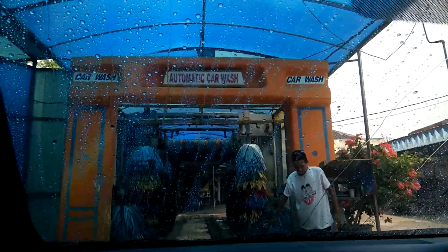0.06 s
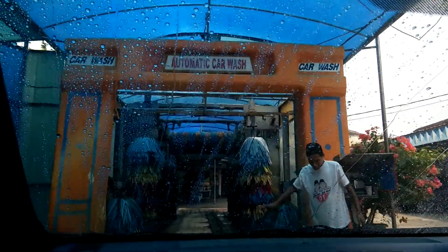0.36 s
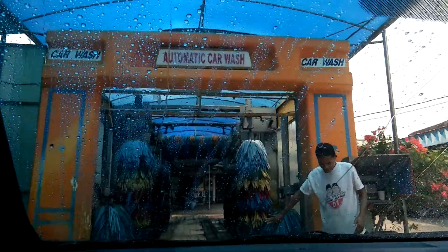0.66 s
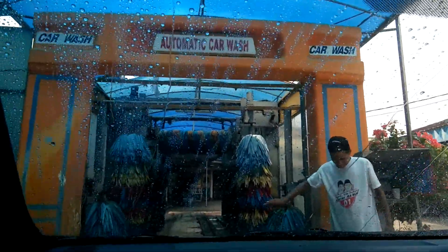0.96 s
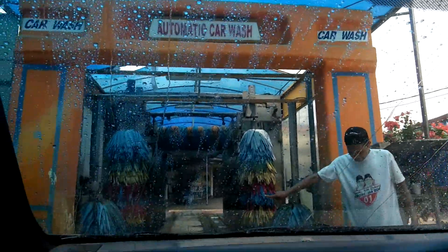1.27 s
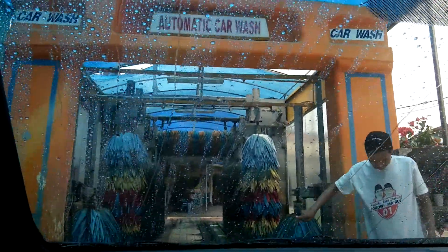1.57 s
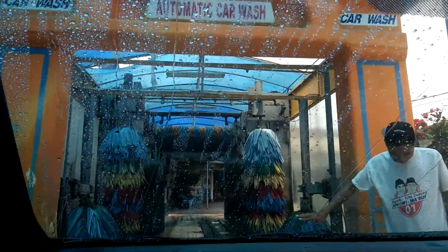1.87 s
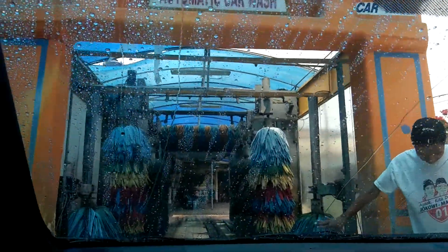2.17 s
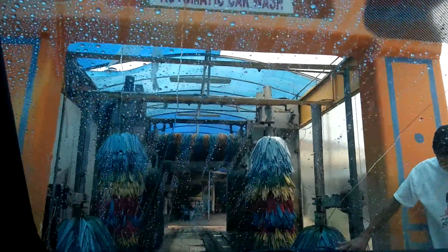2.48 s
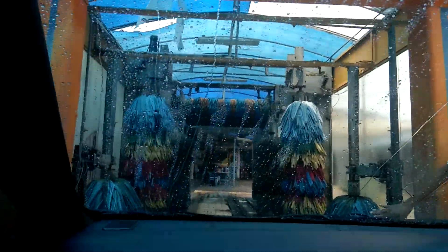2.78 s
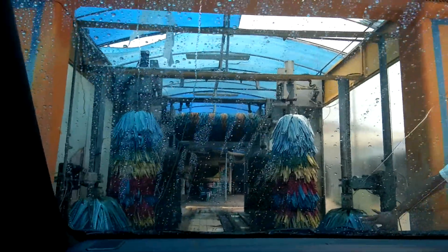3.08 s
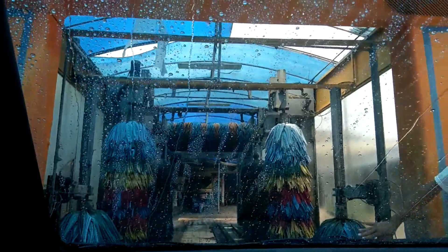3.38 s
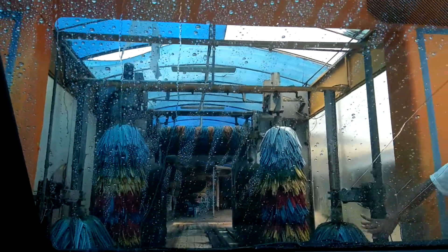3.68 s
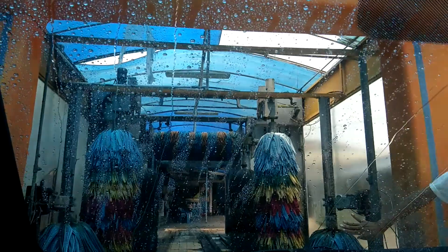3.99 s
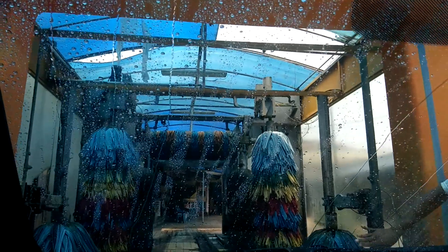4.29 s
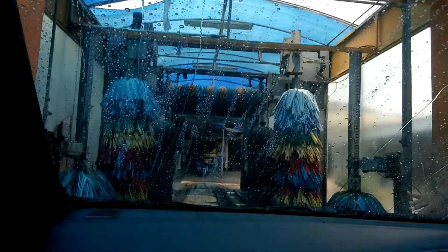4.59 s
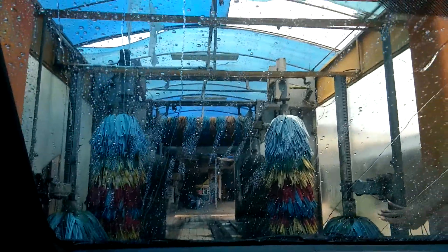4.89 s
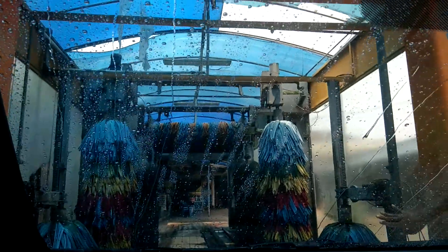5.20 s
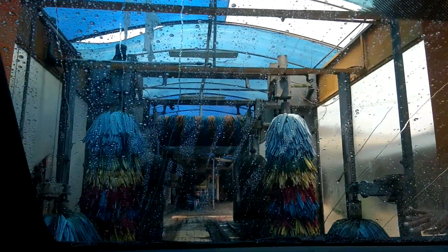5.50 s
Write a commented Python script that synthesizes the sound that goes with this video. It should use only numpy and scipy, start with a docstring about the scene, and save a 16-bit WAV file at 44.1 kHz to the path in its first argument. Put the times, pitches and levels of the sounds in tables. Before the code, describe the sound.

Car wash jets spray a car in three passes, fizzing, drumming and thumping over a low engine hum inside the cabin.

```python
"""Car wash from inside the car

One small microphone in the cabin of an idling car, with the water just beyond the glass and panels.
A fine mist hisses on the windscreen, then jets pass three times over bonnet, glass and roof: the
panels drum and rumble, the spray fizzes, single drops tick. The jets stop suddenly; the engine hums on."""
import sys
import numpy as np
from scipy import signal
from scipy.fft import rfft, irfft
from scipy.io import wavfile

SR = 44100
rng = np.random.default_rng(int(sys.argv[2]) if len(sys.argv) > 2 else 0)


def to_wav(s):
    """Save 16-bit WAV."""
    ch = np.atleast_2d(s).T  # columns
    pcm = np.round(np.clip(ch, -1, 1) * 32767)  # PCM
    wavfile.write(sys.argv[1], SR, pcm.astype(np.int16))


N = 248503
TIME = np.arange(N) / SR


def amp(db):
    """Decibels to gain."""
    return 10 ** (np.asarray(db) / 20)


def evened(x):
    """Scales to rms 1."""
    return x / np.sqrt(np.mean(x ** 2) + 1e-20)


def level(rows):
    """Rows of seconds and dB as a gain, dying at 250 dB a second after the last."""
    s, db = np.transpose(rows)
    return amp(np.interp(TIME, s, db) - 250 * np.maximum(TIME - s[-1], 0))


def add(mix, s, sound):
    """Mixes a sound in at s seconds."""
    part = mix[max(round(s * SR), 0):][:len(sound)]
    part += sound[:len(part)]


def colour(x, spectrum, peaks=()):
    """Filters x through a spectrum and the resonances on it; rms 1."""
    grid = np.fft.rfftfreq(16384, 1 / SR)
    hz, db = np.transpose(spectrum)
    octaves_outside = abs(np.log2((grid + 1) / np.clip(grid + 1, hz[0], hz[-1])))
    shape_db = np.interp(np.log(grid + 1), np.log(hz), db) - 30 * octaves_outside
    for centre, width, lift_db in peaks:
        shape_db += lift_db / (1 + (2 * (grid - centre) / width) ** 2)
    log_gain = np.log(amp(np.maximum(shape_db, -100)))
    mirrored = np.concatenate([log_gain, log_gain[-2:0:-1]])
    ring = irfft(np.exp(np.conj(signal.hilbert(mirrored)))[:len(grid)])  # minimum phase
    return evened(irfft(rfft(x) * rfft(ring, N), N))


def drift(rate_hz):
    """A smooth random wavering up to about this rate; rms 1."""
    hz = np.fft.rfftfreq(N, 1 / SR)
    band = hz / (hz + rate_hz / 4) / (1 + (hz / rate_hz) ** 4)
    return evened(irfft(rfft(rng.standard_normal(N)) * band, N))


def drops(per_s, spread_db, wash):
    """Impacts of many small and a few large drops over a smooth wash."""
    size = amp(spread_db * np.minimum(rng.exponential(1, N), 4)) * rng.choice([-1, 1], N)
    impacts = evened(size * (rng.random(N) < per_s / SR))
    return evened(impacts + wash * rng.standard_normal(N))


def gushes(per_s, fade_s, depth):
    """Water arrives in clumps that strike at once and drain away: a gain around 1."""
    clumps = rng.uniform(0.34, 1, N) * (rng.random(N) < per_s / SR)
    draining = signal.lfilter([1], [1, -np.exp(-1 / (fade_s * SR))], clumps)
    return np.sqrt(evened(1 + depth * draining))


def wander(x, depth_db, patch_hz, patch_s):
    """As the point of impact moves, neighbouring modes swell and fade in turn."""
    frames = signal.stft(x, nperseg=1024, noverlap=768)[2]
    across = signal.windows.hann(max(int(2 * patch_hz * 1024 / SR), 3))
    along = signal.windows.hann(max(int(2 * patch_s * SR / 256), 3))
    patches = signal.fftconvolve(rng.standard_normal(frames.shape), np.outer(across, along), "same")
    frames *= amp(depth_db * np.clip(evened(patches), -2, 2))
    return evened(signal.istft(frames, nperseg=1024, noverlap=768)[1][:N])


def driven(db, drain_db_per_s, by_heavy=0, by_light=0):
    """Gain that follows the heavy water and light drops (dB per dB) and dies away after each pass."""
    # Three passes of the jets. Each row: time in seconds, heavy water in dB, light drops in dB.
    first_pass = [(0.83, -46.5, -50), (0.866, -53.5, -48.5), (1.29, -46, -48.5), (1.422, -53, -56),
                  (1.52, -45, -60.5)]
    second_pass = [(1.55, -41.5, -63), (1.63, -41.5, -46.5), (1.738, -41.5, -44), (1.81, -53, -59.5),
                   (1.92, -56, -80)]
    long_pass = [(1.942, -49, -61.5), (1.985, -43.5, -50), (2.08, -40.5, -56.5), (2.14, -46, -56.5),
                 (2.59, -41, -54.5), (2.62, -43, -59), (2.86, -40.5, -39), (3.0, -30.5, -44.5),
                 (3.04, -37, -48), (3.192, -39, -51.5), (3.21, -38.5, -53), (3.39, -35, -52.5),
                 (3.66, -32.5, -49.5), (4.14, -35, -50), (4.316, -37.5, -42)]
    middling_heavy_db, middling_light_db, onset_db_per_s = -41, -50, 503
    gain = np.zeros(N)
    for rows in (first_pass, second_pass, long_pass):
        s, heavy, light = np.transpose(rows)
        flow_db = by_heavy * (heavy - middling_heavy_db) + by_light * (light - middling_light_db)
        before, after = np.maximum(s[0] - TIME, 0), np.maximum(TIME - s[-1], 0)
        fade_db = onset_db_per_s * before + drain_db_per_s * after
        gain = np.maximum(gain, amp(db + np.interp(TIME, s, flow_db) - fade_db))
    return gain


def idle(waver_db=2.2, throb=0.44):
    """Wavering engine orders over the dull background of the cabin, which throbs with each firing."""
    # Engine speed. Each row: time in seconds, firing rate in Hz.
    firing = [(0, 27.2), (4.5, 25.68)]
    # Engine hum. Each row: multiple of the firing rate, level in dB.
    orders = [(2, -62.5), (3, -59), (5, -69.5)]
    # Cabin background. Each row: frequency in Hz, relative level in dB.
    cabin = [(30, -23), (50, 3), (95, -4), (135, -5), (220, -19), (400, -20), (600, -31), (1300, -33.5),
             (2200, -39), (6000, -45.5), (15500, -46)]
    # Its loudness. Each row: time in seconds, level in dB.
    cabin_db = [(0, -52.5), (.7, -52.5), (5.63, -59.5)]
    firing_hz = np.interp(TIME, *np.transpose(firing)) * (1 + .015 * drift(rate_hz=6))
    cycles = np.cumsum(firing_hz) / SR
    hum = np.zeros(N)
    for order, db in orders:
        peak = np.sqrt(2) * amp(db + waver_db * drift(rate_hz=3.5))
        hum += peak * np.sin(2 * np.pi * (order * cycles + rng.random()))
    air = colour(rng.standard_normal(N), cabin) * level(cabin_db)
    bass = signal.sosfilt(signal.butter(2, 400, fs=SR, output="sos"), air)
    return hum + air + throb * bass * np.cos(2 * np.pi * cycles)


def thumps():
    """The body of the car flexes and jolts: a panel gives way and swings out."""
    # Each row: start in seconds, level in dB, pitch in Hz, rise and 60 dB decay in seconds.
    jolts = [(0.012, -36, 80.7, 0.0038, 0.32), (0.867, -27.5, 111, 0.0029, 0.075),
             (1.753, -25.5, 263, 0.014, 0.17), (2.191, -27, 52.2, 0.028, 0.4),
             (2.254, -34, 133, 0.0037, 0.072), (2.874, -20.5, 131, 0.0016, 0.21),
             (3.061, -1, 45.7, 0.065, 0.23), (3.416, -22.5, 145.4, 0.027, 0.22),
             (3.68, -19.5, 53.8, 0.01, 0.24), (4.059, -16.5, 137, 0.0068, 0.1),
             (4.249, -20, 136, 0.0019, 0.14), (5.11, -41, 77.7, 0.034, 0.25)]
    out, t = np.zeros(N), TIME[:SR // 2]
    for s, db, hz, rise, t60 in jolts:
        envelope = amp(db - 60 * t / t60) * (1 - np.exp(-(t / rise) ** 2))
        add(out, s, envelope * np.sin(2 * np.pi * hz * t))
    return out


def mist():
    """A fluttering fan of fine droplets rings the windscreen."""
    # The mist closing in. Each row: time in seconds, relative level in dB.
    approach = [(0.0, -74), (0.35, -76), (0.765, -59), (0.8, -49.5), (0.85, -45.5), (0.935, -45.5),
                (0.99, -50.5), (1.02, -62), (1.12, -79)]
    # Its hiss. Each row: frequency in Hz, relative level in dB.
    hiss = [(600, -2), (2300, -6), (3200, -14), (7500, -12), (10000, -6.5), (12200, -6.5), (13500, -11),
            (15500, -20)]
    # Windscreen resonances. Each row: centre in Hz, width in Hz, lift in dB.
    glass = [(1330, 340, 8.7), (2140, 180, 9.3), (4070, 600, 6.3), (10800, 960, 4.5), (11700, 930, 5.5)]
    impacts = drops(per_s=7900, spread_db=3.5, wash=0.14) * gushes(per_s=130, fade_s=0.005, depth=7)
    impacts = wander(impacts, depth_db=2.2, patch_hz=350, patch_s=.1)
    return amp(1.5) * colour(impacts, hiss, glass) * level(approach)


def bodywork(surge):
    """Heavy water drums the bonnet ahead and the roof overhead; light drops patter on trim and glass."""
    # Roof, bonnet, and thin trim with glass. Each row: frequency in Hz, relative level in dB.
    shell = [(290, -37), (350, -17), (430, -11), (515, -16.5), (670, -16.5), (900, -12), (1170, -22.5),
             (1450, -22.5), (2100, -37.5)]
    hollow = [(165, -27.5), (205, -7), (262, -3), (305, -9), (380, -13.5)]
    trim = [(560, -5.5), (690, 2.5), (860, -2.5), (1120, -5), (1400, -4.5), (2000, -2), (2600, -4),
            (3100, -16), (4500, -30.5)]
    # Bodywork resonances and one notch. Each row: centre in Hz, width in Hz, lift in dB.
    panels = [(423.9, 87, 15.5), (465, 14, 9.5), (570, 30, 7), (673, 26, -8), (831.6, 61, 9.5),
              (881.5, 13, 8), (1110, 19, 7.5), (1321, 100, 9), (1457, 34, 9.5), (1602, 24, 9.5),
              (1810, 100, 5), (2017, 47, 4), (2378, 28, 11)]
    heavy = drops(per_s=2500, spread_db=3, wash=0.63) * amp(0.38 * surge)
    heavy = wander(heavy, depth_db=2.3, patch_hz=150, patch_s=.08)
    light = drops(per_s=3000, spread_db=3, wash=0.55) * amp(1.37 * surge)
    light = wander(light, depth_db=2.7, patch_hz=200, patch_s=.06)
    roof = colour(heavy, shell, panels) * driven(db=-41, by_heavy=1.19, drain_db_per_s=232)
    bonnet_jets = driven(db=-47, by_heavy=0.31, by_light=0.36, drain_db_per_s=198)
    bonnet = colour(heavy, hollow) * np.hypot(sheets(), bonnet_jets)
    patter = colour(light, trim, panels) * driven(db=-48, by_light=0.91, drain_db_per_s=320)
    return roof + bonnet + patter


def shudder():
    """The push of the heavy water shakes the roof and the air around the microphone."""
    # Cabin boom and roof rumble. Each row: frequency in Hz, relative level in dB.
    cabin = [(27, -62), (38, -12), (47, -3.5), (62, -1), (80, -20.5), (130, -46.5)]
    roof = [(55, -42.5), (85, 2), (128, 1.5), (152, 1), (178, -12), (280, -23)]
    boom = colour(rng.standard_normal(N), cabin) * driven(db=-49.5, by_heavy=1.7, drain_db_per_s=40)
    rumble = colour(rng.standard_normal(N), roof) * driven(db=-45, by_heavy=0.93, drain_db_per_s=95)
    return boom + rumble


def spray(surge):
    """Droplets burst on the glass: squirts patter sharply, light drops make a finer splash and fizz."""
    # Splash and fizz heard through the glass. Each row: frequency in Hz, relative level in dB.
    splash = [(2200, -35), (3100, 7), (4400, 8), (5500, -6), (8000, -21)]
    fizz = [(4000, -14.5), (5900, 2), (6900, -4.5), (8100, -10), (10000, -6), (12200, -3), (13500, -8),
            (15500, -18)]
    # Sheen of the finest droplets. Each row: centre in Hz, width in Hz, lift in dB.
    sheen = [(14600, 2400, 2.5)]
    patter = drops(per_s=1600, spread_db=3, wash=0.45) * gushes(per_s=220, fade_s=0.003, depth=5)
    fine = evened(rng.standard_normal(N)) * amp(1.4 * surge)
    fine = wander(fine, depth_db=2, patch_hz=600, patch_s=.04)
    direct = (amp(-4.5) * colour(patter, splash) + colour(patter, fizz)) * squirts()
    splashing = colour(fine, splash) * driven(db=-67.5, by_light=0.76, drain_db_per_s=227)
    fizzing = colour(fine, fizz, sheen) * driven(db=-71, by_light=0.75, drain_db_per_s=350)
    return direct + splashing + fizzing


def runoff():
    """A thin wash of water runs down the car and ebbs slowly after each pass."""
    # Each row: frequency in Hz, relative level in dB.
    wash = [(400, -5.5), (780, 5.5), (1200, -16.5), (4500, -16.5)]
    return colour(rng.standard_normal(N), wash) * driven(db=-66.5, drain_db_per_s=32.5)


def slaps_and_ticks(spit_db=-6.5):
    """Water hits in short dying bursts; single drops ring more narrowly, and bright hits spit hiss."""
    # Single drops on the glass. Each row: start in seconds, relative level in dB.
    ticks = [(1.784, -39), (1.8007, -37), (1.8347, -40), (1.8692, -44), (1.887, -41), (1.911, -42.5),
             (1.93, -44)]
    # Slaps on glass and panels. Each row: start in seconds, relative level in dB, centre in Hz.
    slaps = [(0.919, -30, 11000), (1.49, -42, 5900), (1.65, -36.5, 3600), (1.726, -29, 2120),
             (1.941, -30.5, 634), (1.973, -42, 4600), (2.1204, -44.5, 6160), (2.198, -44, 12000),
             (2.252, -22, 435), (2.509, -41.5, 5500), (2.5674, -36.5, 4430), (2.868, -27.5, 1720),
             (2.954, -35.5, 3180), (2.973, -23, 530), (3.203, -28, 770), (3.428, -45.5, 3450),
             (3.694, -47.5, 5000), (3.787, -37.5, 3350), (3.97, -48, 4600), (4.219, -39, 3320),
             (4.296, -39, 3620)]
    out, t = np.zeros(N), TIME[:SR // 4]

    def hit(db, hz, t60, rise_s, spread):
        band = signal.butter(2, [hz / (1 + spread), hz * (1 + spread)], "band", fs=SR, output="sos")
        noise = rng.standard_normal(len(t))
        on_glass = hz > 4000
        burst = evened(signal.sosfilt(band, noise)) + on_glass * amp(spit_db) * noise
        return amp(db - 13) * burst * (1 - np.exp(-t / rise_s)) * amp(-60 * t / t60)

    for s, db in ticks:
        add(out, s, hit(db, hz=5050, t60=.02, rise_s=.0009, spread=.115))
    for s, db, hz in slaps:
        add(out, s, hit(db, hz, t60=.14, rise_s=.002, spread=.2))
    return out


def sheets(swell_s=0.064):
    """Gain of the sheets of water that swell on the bonnet and slide off."""
    # Each row: time of the peak in seconds, level in dB.
    swells = [(1.04, -43), (2.922, -39), (3.719, -31), (4.317, -38)]
    return sum(amp(db) * np.exp(-((TIME - s) / swell_s) ** 2) for s, db in swells)


def streaks():
    """A narrow jet drags across a panel or pane, whose ring swells, glides and fades as the spot moves."""
    # Each row: start and length in seconds, relative level in dB, first and last pitch in Hz.
    crossings = [(1.009, 0.11, -46.5, 790, 960), (1.55, 0.14, -47, 1300, 1560),
                 (1.568, 0.19, -44, 860, 950), (2.029, 0.059, -39.5, 422, 420), (2.03, 0.13, -49, 830, 840),
                 (2.285, 0.088, -53.5, 1560, 2640), (2.491, 0.081, -39.5, 410, 414),
                 (2.695, 0.14, -37.5, 796, 880), (3.486, 0.089, -43, 1110, 1460),
                 (3.56, 0.19, -33, 440, 454), (3.83, 0.26, -34.5, 458, 439)]
    out = np.zeros(N)
    for start, length, db, start_hz, end_hz in crossings:
        progress = np.arange(0, length, 1 / SR) / length
        hz = start_hz * (end_hz / start_hz) ** progress
        carrier = np.exp(2j * np.pi * np.cumsum(hz) / SR)
        width_hz = 0.17 * np.sqrt(start_hz * end_hz)
        pole = np.exp(-np.pi * width_hz / SR)
        stream = rng.standard_normal(SR)[:len(progress)]
        # Shift down, smooth, shift back up: a resonance that follows the pitch.
        ring = (signal.lfilter([1], [1, -2 * pole, pole ** 2], stream / carrier) * carrier).real
        add(out, start, amp(db) * evened(ring * np.sin(np.pi * progress)) / np.sqrt(2))
    return out


def squirts(rise_s=0.0052, t60=0.12):
    """Gain of the squirts straight onto the glass: each lands at once, holds, and runs off."""
    # Each row: start in seconds, length in seconds, level in dB.
    landings = [(1.349, 0.13, -63), (1.635, 0.105, -73), (2.112, 0.293, -63.5), (2.44, 0.23, -66.5)]
    gain = np.zeros(N)
    for start, length, db in landings:
        t = np.maximum(TIME - start, 0)
        fall_db = 60 * np.maximum(t - length, 0) / t60
        gain = np.maximum(gain, np.minimum(t / rise_s, 1) * amp(db - fall_db))
    return gain


def squeak(length_s=0.086):
    """A faint thin tone swells and fades."""
    # Each row: start in seconds, level in dB, pitch in Hz.
    tones = [(4.72, -76, 1520)]
    out, t = np.zeros(N), np.arange(0, length_s, 1 / SR)
    for s, db, hz in tones:
        add(out, s, amp(db) * np.sin(np.pi * t / length_s) ** 2 * np.sin(2 * np.pi * hz * t))
    return out


def scene():
    """The cabin in mono; the drumming and the spray share one quick surge of the jets."""
    surge = drift(rate_hz=30)
    water = bodywork(surge) + shudder() + spray(surge) + mist() + slaps_and_ticks() + streaks()
    return (water + thumps() + idle() + squeak() + runoff())[None]


def record(dry, low_hz=35, top_hz=15600):
    """The small microphone sheds the deepest bass; the highest treble is cut off too."""
    thinned = signal.sosfilt(signal.butter(4, low_hz, "high", fs=SR, output="sos"), dry)
    band_limit = signal.firwin(511, top_hz, window=("kaiser", 9), fs=SR)
    return signal.oaconvolve(thinned, band_limit[None], "same")


dry = scene()
out = record(dry)
to_wav(out)
```